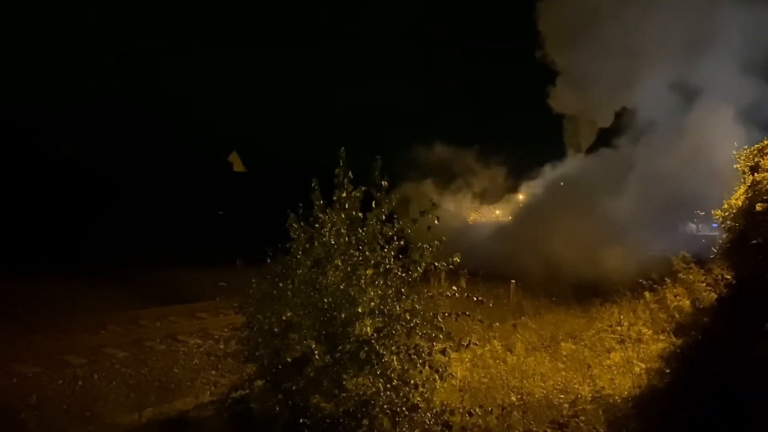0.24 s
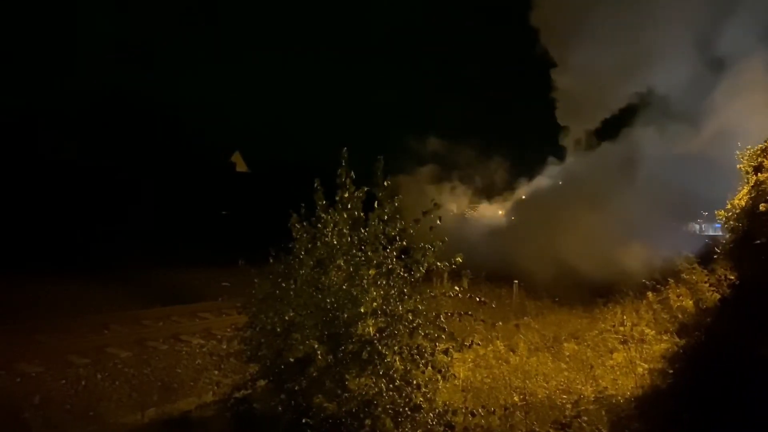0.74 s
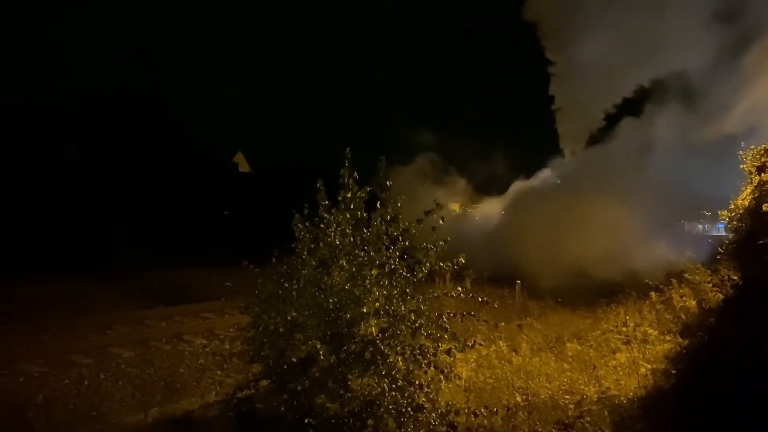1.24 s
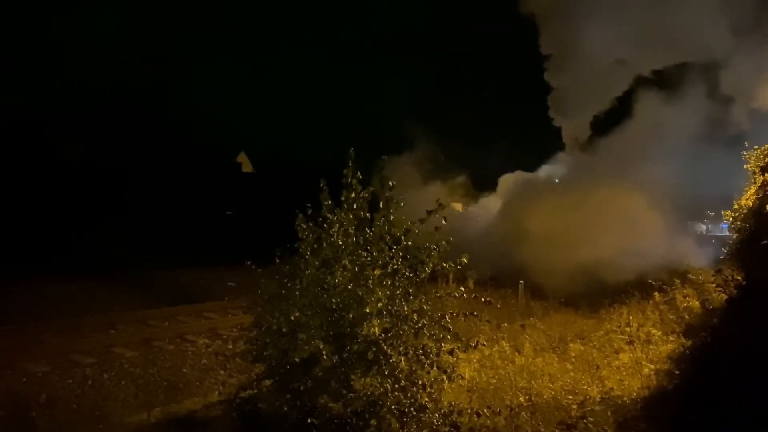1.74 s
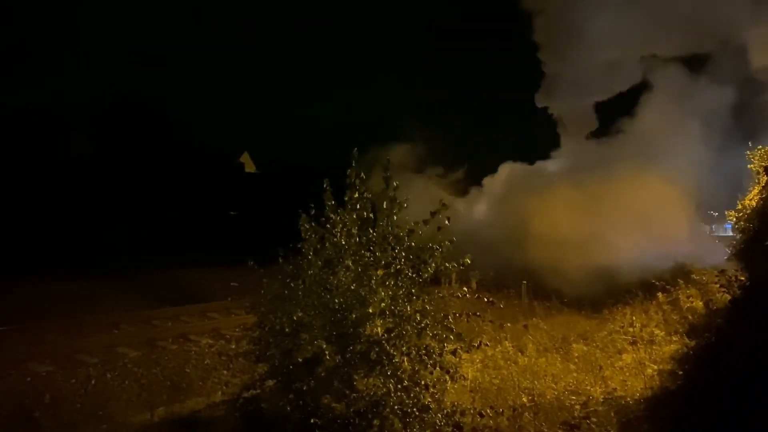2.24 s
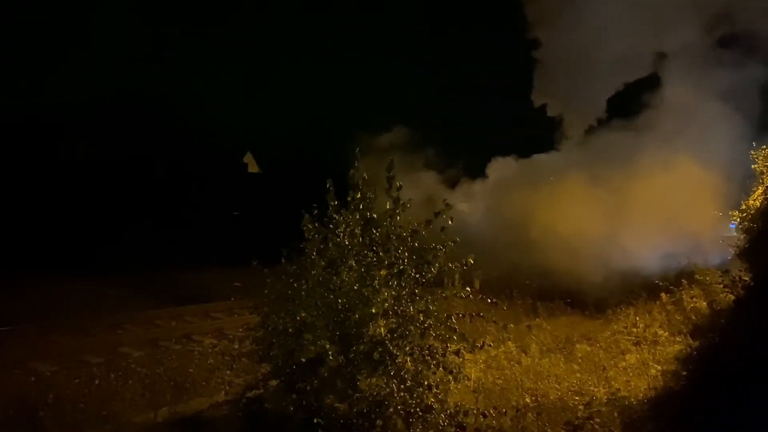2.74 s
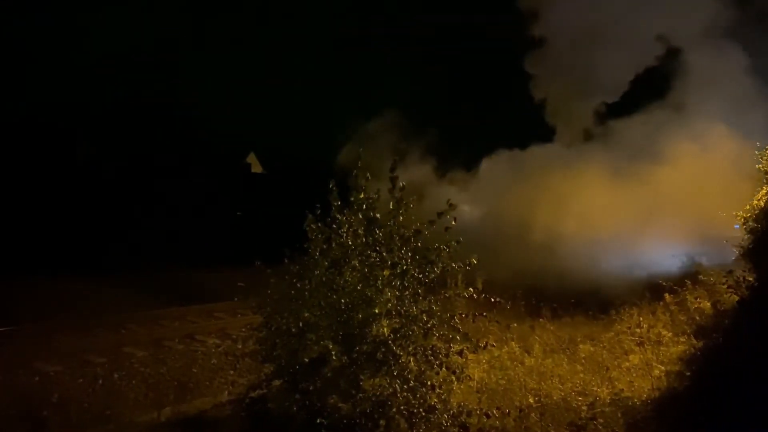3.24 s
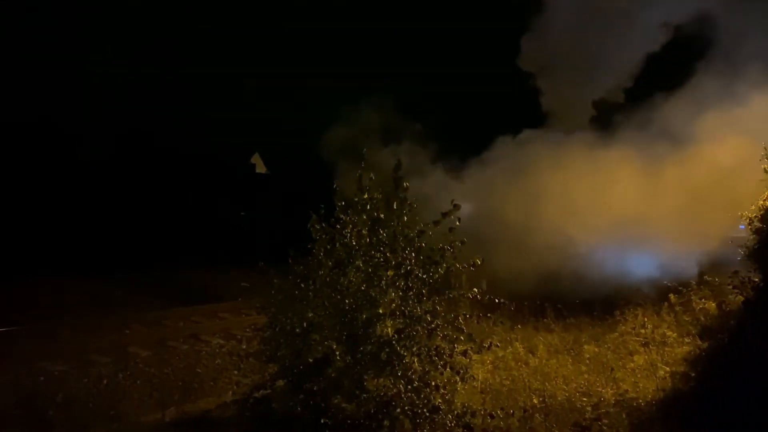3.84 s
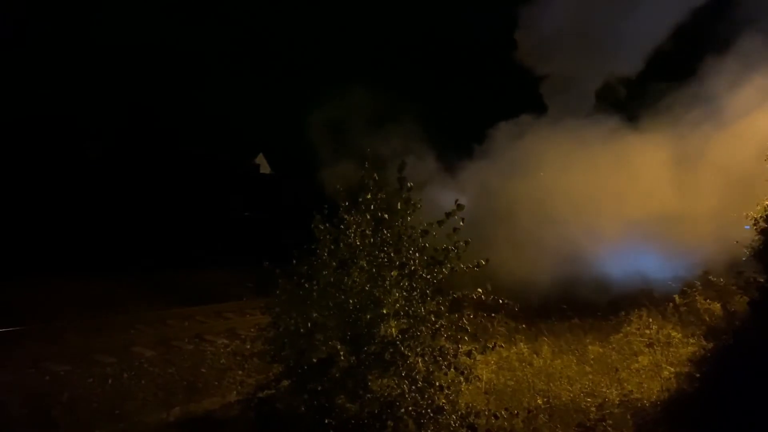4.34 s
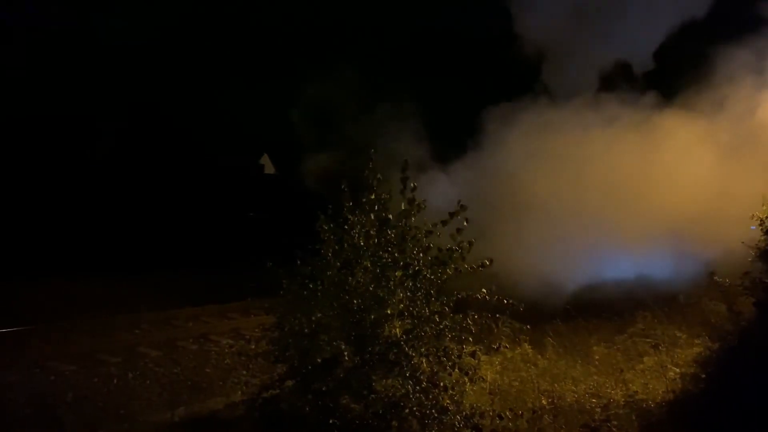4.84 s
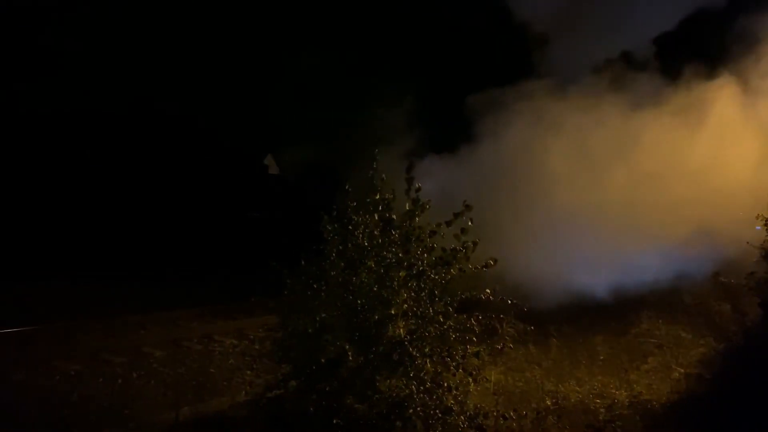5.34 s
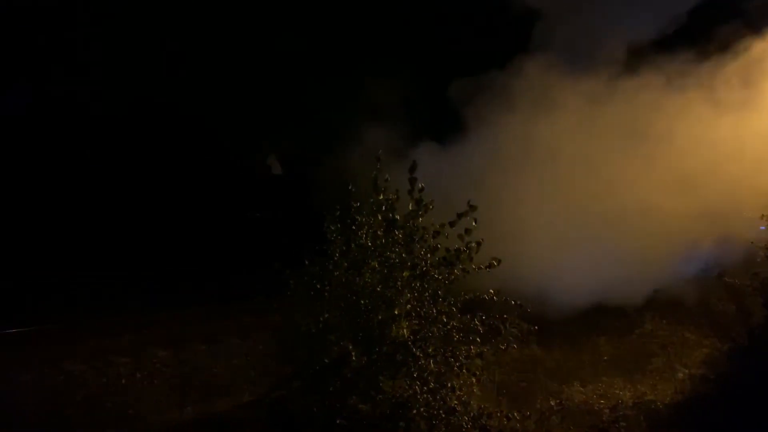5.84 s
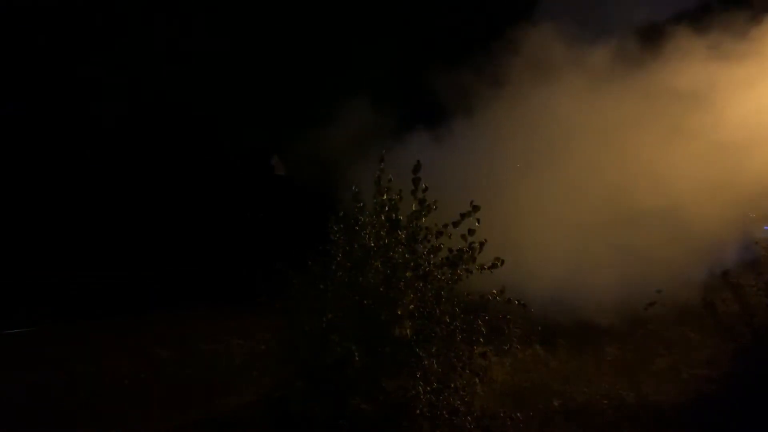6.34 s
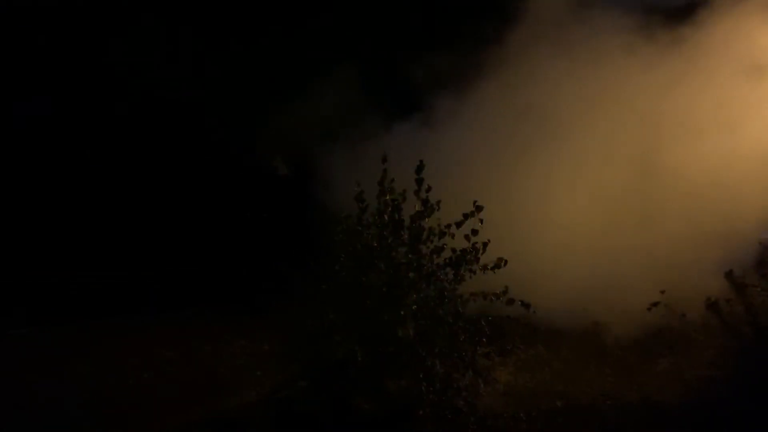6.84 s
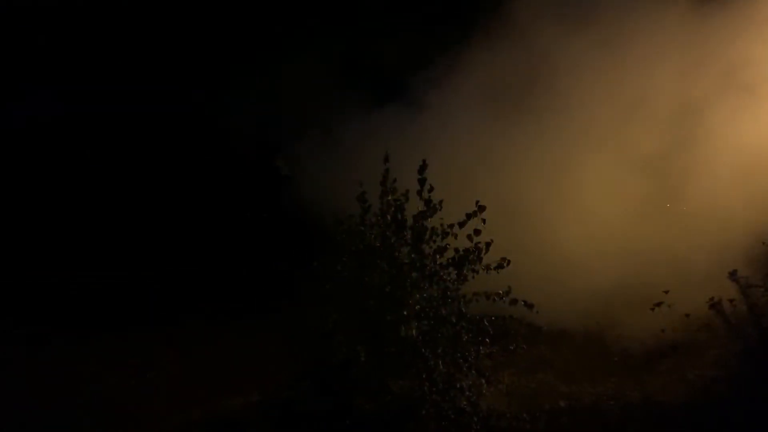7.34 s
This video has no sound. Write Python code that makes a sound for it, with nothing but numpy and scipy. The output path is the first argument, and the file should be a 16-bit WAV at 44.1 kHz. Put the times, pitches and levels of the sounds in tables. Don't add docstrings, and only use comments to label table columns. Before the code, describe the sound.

Powerful rushing steam jet hisses and surges for over six seconds, cuts suddenly, and rings away into faint far traffic and dull thuds.

```python
import sys
import numpy as np
from scipy import signal
from scipy.fft import rfft, irfft, next_fast_len
from scipy.io import wavfile
from scipy.ndimage import map_coordinates

SR = 44100
rng = np.random.default_rng(int(sys.argv[2]) if len(sys.argv) > 2 else 0)


def convert_level_to_amplitude(level_db):
    exponent = np.asarray(level_db, float) / 20
    return 10 ** exponent


def inscribe(sig):
    pcm = np.round(np.clip(np.atleast_2d(sig).T, -1, 1) * 32767)
    wavfile.write(sys.argv[1], SR, pcm.astype(np.int16))


N = 333836
SIZE = next_fast_len(N)
HZ = np.maximum(np.arange(SIZE // 2 + 1) * SR / SIZE, 1)
TIME = np.arange(N) / SR
LOWS = 1 / (1 + (HZ / 9000) ** 8)

# lag in ms, gain, centre in Hz, width in octaves.
RIGHT_NEAR = [(-.025, 1.25, 624, 1.05), (-.148, -.95, 4458, .25), (-.06, 2.29, 7935, .12),
              (-.25, -1.15, 11000, .3), (-.350, 1, 15300, .1)]
# time in seconds, level in dB, pitch in Hz, spread in seconds.
WHEEL_THUDS = [
    (6.585, -41, 100, .018),
    (6.77, -46, 105, .018),
    (7.112, -38, 95, .014),
    (7.5, -46, 160, .025),
]


def on_hz(table, hz, column=1):
    table = np.array(table)
    return np.interp(np.log(hz), np.log(table[:, 0]), table[:, column])


def noise(count):
    return rfft(rng.standard_normal((count, SIZE)))


def band_db(x, lo_hz, hi_hz):
    spectrum = rfft(x.mean(0), SIZE)[(HZ > lo_hz) & (HZ < hi_hz)]
    return 10 * np.log10(2 * np.sum(abs(spectrum) ** 2) / SIZE / N)


def shape(x, rule_db, size=256):
    overlap = size * 3 // 4
    hz, s, cells = signal.stft(x, SR, nperseg=size, noverlap=overlap)
    cells = cells * convert_level_to_amplitude(rule_db(s[None], np.maximum(hz, 20)[:, None]))
    return signal.istft(cells, SR, nperseg=size, noverlap=overlap)[1][..., :x.shape[-1]]


def patches(s, hz, rate, octaves):
    grid = rng.standard_normal((64, 512))
    places = np.broadcast_arrays(np.log2(hz / 20) / octaves, s * rate)
    return map_coordinates(grid, places, order=3, mode="wrap")


def bell(x, spread):
    return np.exp(-.5 * (x / spread) ** 2)


def paths(table):
    response = 0
    for lag_ms, gain, centre_hz, octaves in table:
        band = bell(np.log2(HZ / centre_hz), octaves)
        response = response + gain * band * np.exp(-2j * np.pi * HZ * lag_ms / 1000)
    return response


def night_air():
    # frequency in Hz, level in dB per Hz.
    air_colour = [(1500, -9.5), (2500, 1), (4000, -9.5), (6000, -6.5), (8000, -14), (11000, -17),
                  (15000, -20)]
    air_db, fade_from_s, fade_db_per_s = -77, 7.1, -3.
    rustle_start_s, rustle_stop_s, rustle_db = 7.07, 7.27, 5
    air, own = noise(count=2) * convert_level_to_amplitude(on_hz(air_colour, HZ))
    right = air * paths(RIGHT_NEAR) + .5 * own * LOWS
    hush = irfft(np.array([air, right]), SIZE)[:, :N]
    rustle = np.clip(np.minimum(TIME - rustle_start_s, rustle_stop_s - TIME) / .03, 0, 1)
    fade_db = fade_db_per_s * np.maximum(TIME - fade_from_s, 0)
    return hush * convert_level_to_amplitude(air_db - band_db(hush, 5000, 11000) + rustle_db * rustle + fade_db)


def road():
    # frequency in Hz, level in dB per Hz.
    road_colour = [(15, -46), (25, -30.5), (53, 2), (129, -4.5), (157, -6.5), (240, -12.5), (299, -11.5),
                   (342, -16), (436, -17.5), (533, -16), (695, -17), (991, -27), (1350, -24.5), (1510, -31),
                   (5000, -55), (6500, -89.5), (11000, -120)]
    # time in seconds, rumble level in dB.
    traffic = [
        (0.0, -55),
        (0.02, -56.5),
        (2.02, -52.5),
        (5.31, -48),
        (5.33, -46),
        (6.35, -49),
        (6.6, -45.5),
        (6.64, -48),
        (7.57, -49),
    ]
    rest_db = -52
    roar_db, roar_gain = -57.5, .8
    whine_db, whine_gain = -58.5, 0.5
    clatter_db, clatter_s, clatter_hz, clatter_octaves = 5., .045, 500, 1.1

    mid, side = noise(count=2) * convert_level_to_amplitude(on_hz(road_colour, HZ))
    side = side * np.clip(HZ / 1800, .05, 1)
    roar = irfft(np.array([mid + side, mid - side]), SIZE)[:, :N]
    low_db, high_db, top_db = band_db(roar, 40, 160), band_db(roar, 160, 420), band_db(roar, 600, 1500)

    def swell_db(s, hz):
        near = np.interp(s, *np.transpose(traffic)) - rest_db
        rumble = rest_db + near - 1.45 - low_db
        roar_share = np.clip(np.log2(hz / 120), 0, 1)
        whine_share = np.clip(np.log2(hz / 400), 0, 1)
        level = rumble + roar_share * (roar_db + roar_gain * near - high_db - rumble)
        level = level + whine_share * (whine_db + whine_gain * near - top_db - level)
        clatter = sum(bell(s - at, clatter_s) for at, *_ in WHEEL_THUDS)
        level = level + clatter_db * clatter * bell(np.log2(hz / clatter_hz), clatter_octaves)
        return level + 1.2 * patches(s, hz, 4.6, 0.817)
    return shape(roar, swell_db, size=2048)


def engines():
    # start in seconds, stop in seconds, first pitch in Hz, last pitch in Hz, top level in dB.
    notes_pulled = [(1.1, 2.75, 83, 103, -54), (2.95, 4.7, 120, 134, -54.5), (2.91, 4.9, 198, 202, -55.5),
                    (4.9, 5.8, 190, 170, -59.5), (5.0, 6.2, 84, 84, -49.5), (6.3, 7.2, 91, 96, -53),
                    (2.2, 5.3, 55, 55, -57), (6.2, 8.4, 50, 59, -56), (1.45, 2.2, 318, 316, -63),
                    (1.9, 3.5, 290, 358, -62), (3.2, 4.7, 348, 322, -62), (4.7, 5.8, 310, 335, -61),
                    (5.9, 6.9, 305, 340, -61)]
    swell_power, wander_share = .6, .012
    out, coarse = np.zeros(N), TIME[::256]
    for start, stop, from_hz, to_hz, db in notes_pulled:
        along = np.clip((TIME - start) / (stop - start), 0, 1)
        waver = np.interp(TIME, coarse, patches(coarse, 20, 8., 1))
        wander = np.interp(TIME, coarse, patches(coarse, 20, 3., 1))
        hz = (from_hz + (to_hz - from_hz) * along) * (1 + wander_share * wander)
        swell = abs(np.sin(np.pi * along)) ** swell_power
        level = np.sqrt(2) * swell * convert_level_to_amplitude(db - 1.2 + 2.5 * waver)
        out += level * np.sin(2 * np.pi * np.cumsum(hz) / SR)
    return out


def thuds():
    out = np.zeros(N)
    for at, db, hz, spread in WHEEL_THUDS:
        out += convert_level_to_amplitude(db) * bell(TIME - at, spread) * np.sin(2 * np.pi * hz * (TIME - at))
    return out


def yard(x):
    # level in dB, 60 dB decay time in seconds at 1 kHz, factor on that time per octave.
    tails = [
        (-25.5, 0.87, 0.82),
        (-24.5, 3.9, 0.68),
    ]
    # lag in seconds, level in dB, top frequency in Hz.
    slaps = [
        (0.049, -25.5, 9500),
        (0.111, -26, 9000),
        (.22, -38, 4000),
    ]
    length = 2 * SR
    response = np.zeros((2, length))

    def add(sound, db):
        response[:] += convert_level_to_amplitude(db) * sound / np.sqrt(np.sum(sound ** 2, axis=1, keepdims=True))

    for db, t60, shorten in tails:
        hiss = rng.standard_normal((2, length))
        add(shape(hiss, lambda s, hz: -60 * s / (t60 * shorten ** np.log2(hz / 1000))), db)
    for lag, db, top_hz in slaps:
        burst = rng.standard_normal((2, length)) * bell(TIME[:length] - lag, 0.0081)
        add(signal.sosfilt(signal.butter(1, top_hz, fs=SR, output="sos"), burst), db)
    left, right = rfft(response, SIZE)
    right = right * LOWS + left * (1 - LOWS)
    ring = irfft(np.array([left, right]), SIZE)[:, :length]
    return signal.fftconvolve(x, ring, axes=1)[:, :N]


def jet_hiss():
    # frequency in Hz, jet level in dB per Hz, scattered share left in dB, scattered share right in dB.
    jet_colour = [(430, -20, -20, -10), (650, -9.5, -14, -7.5), (874, -6.5, -20, -17),
                  (1300, -4.5, -5, -11.5), (1900, 0.0, -10, -11.5), (2800, -7.5, 2, 2.5),
                  (4000, -8, 5.5, 1.2), (5730, -7.5, 0.5, 4), (6970, -8, 2.5, 5), (7900, -9, 4.5, -22),
                  (9600, -6.5, -8.5, -8.5), (11930, -12.5, 4, -9), (14000, -20, -20, -15),
                  (15150, -18, -23.5, 7.5)]
    # lag in ms, gain, centre in Hz, width in octaves.
    left_paths = [
        (1.932, -.4, 1165, .7),
        (1.756, -.59, 3423, .31),
        (.5, -.23, 3579, 2.44),
    ]
    # lag in ms, gain, centre in Hz, width in octaves.
    right_echo = [
        (2.024, -1.38, 1782, .83),
        (1.816, .96, 4837, .39),
    ]
    # lag in ms, gain, centre in Hz, width in octaves.
    scatter_echo = [
        (2.01, -.42, 2300, .7),
        (1.74, -.45, 5250, .16),
    ]
    jet, left, right = noise(count=3)
    scatter = (1 + paths(scatter_echo)) * convert_level_to_amplitude(-2.5) * LOWS
    left = jet * (1 + paths(left_paths)) + left * scatter * convert_level_to_amplitude(on_hz(jet_colour, HZ, column=2))
    right = jet * paths(RIGHT_NEAR + right_echo) + right * scatter * convert_level_to_amplitude(on_hz(jet_colour, HZ, column=3))
    low_cut = 1 / (1 + (400 / HZ) ** 6)
    return irfft(np.array([left, right]) * convert_level_to_amplitude(on_hz(jet_colour, HZ)) * low_cut, SIZE)[:, :N]


def flow_db(s, hz, hiss):
    edges = np.array([600, 1500, 2800, 6500, 11500])
    # level in dB at rest flow, dB gained per dB of flow.
    jet_parts = [
        (-38, .5),
        (-36, 0.86),
        (-34.5, 1.105),
        (-36, 1.09),
    ]
    # time in seconds, level in dB, brightness in dB per octave.
    steam_flow = [(0.0, -28, 1.4), (0.23, -29, 1.2), (0.48, -31, 0.4), (0.94, -33, -0.3),
                  (1.43, -30.5, -0.3), (1.81, -30.5, -0.5), (2.37, -27, 0.4), (2.73, -29, 0.54),
                  (3.03, -30.5, 0.3), (3.31, -29, 0.4), (3.43, -31, -0.5), (3.61, -29, -0.3),
                  (4.23, -32, 0.2), (5.1, -23.5, -0.54), (5.44, -23.5, -0.14), (5.93, -26, 0.1),
                  (6.22, -20, -0.2), (6.36, -22.5, -0.4)]
    # time in seconds, spread in seconds, level in dB.
    spurts = [
        (1.1, 0.066, 4.5),
        (2.4, .06, 5),
        (2.75, 0.15, 5),
        (3.27, 0.048, 4.5),
        (3.68, 0.057, 4.5),
        (4.41, .035, 8),
        (4.75, 0.044, 4),
        (5.07, 0.046, 5.5),
        (5.38, 0.064, 4.5),
        (6.25, .07, 2.5),
    ]
    rest_flow_db, spurt_hz, spurt_octaves = -29, 9900, .25
    rest_db = [band_db(hiss, *pair) for pair in zip(edges, edges[1:])]
    centres = np.log(edges[1:] * edges[:-1]) / 2
    shares = [np.interp(np.log(hz), centres, row) for row in np.eye(len(centres))]
    times, flow, bright = np.transpose(steam_flow)
    flow = np.interp(s, times, flow) - rest_flow_db
    level = np.interp(s, times, bright) * np.log2(hz / 2800)
    for share, (db, gain), rest in zip(shares, jet_parts, rest_db):
        level = level + share * (db + gain * flow - rest)
    spurt = sum(db * bell(s - at, spread) for at, spread, db in spurts)
    return level + spurt * bell(np.log2(hz / spurt_hz), spurt_octaves)


def vapour_db(s, hz):
    # time in seconds, spread in seconds, centre in Hz, level in dB.
    eddies = [(0.28, 0.37, 4400, 6), (1.0, 0.25, 3050, -4.5), (1.4, 0.21, 1460, 6.5),
              (1.53, 0.6, 6400, 1.5), (3.62, 0.37, 2800, 5.5), (3.85, .2, 4140, 2.5), (4.32, 0.74, 650, 3),
              (4.97, 0.17, 3200, 4.5), (5.5, .2, 1800, 3), (5.62, 0.17, 3400, -4), (5.7, 0.085, 5230, 2.5),
              (5.62, 0.31, 1042, 3), (6.3, 0.2, 3100, 4), (6.3, 0.17, 1700, 1.2), (6.15, .15, 8500, 2),
              (.55, .15, 6000, -3), (5.05, .2, 4300, -2), (1.1, .2, 1100, -2.5), (6.37, .06, 1050, -7),
              (6.39, .05, 650, -6), (3.05, .12, 2200, -4), (4.6, .2, 7500, 3), (.8, .3, 7500, 3),
              (5.65, .1, 8500, 3), (5.4, .15, 780, -3)]
    # time in seconds, spread in seconds, centre in Hz, level in dB.
    teeth = [(.4, 0.37, 1810, 2.5), (1.81, 0.65, 4530, -5), (1.86, 0.26, 1900, -8), (2.55, 0.91, 2240, 6.5),
             (2.6, 0.42, 1750, -5), (3.3, 0.48, 2990, -11), (3.76, 0.35, 1610, -2.5),
             (4.64, 0.21, 2210, -5), (5.39, 0.28, 1300, -7), (5.57, 0.23, 2160, -13),
             (6.22, 0.21, 1200, -13.5), (.1, .15, 1330, -6), (1.9, .4, 1300, 3), (.6, .35, 3600, 4),
             (3.9, .25, 4800, -4)]
    top_flutter_db, top_flutter_hz = 1.2, 14800
    level = 0
    for table, octaves in ((eddies, 0.25), (teeth, 0.058)):
        for at, spread, centre_hz, db in table:
            level = level + db * bell(s - at, spread) * bell(np.log2(hz / centre_hz), octaves)
    level = level + 1.63 * patches(s, hz, 3.248, .12)
    level = level + 0.36 * patches(s, hz, 9., 0.891)
    level = level + 0.87 * patches(s, hz, 35., 0.612)
    top_share = np.clip((hz - top_flutter_hz) / 500 + 1, 0, 1)
    return level + top_flutter_db * patches(s, 20, 14., 1) * top_share


def valve_db(s, hz):
    valve_s, shut_s, treble_lead_s, drop_db = 6.372, .06, .006, -42.5
    shut = np.clip((s - valve_s + treble_lead_s * np.log2(hz / 1500)) / shut_s, 0, 2)
    return drop_db * shut ** 2


def steam():
    hiss = jet_hiss()

    def swell_db(s, hz):
        return flow_db(s, hz, hiss) + vapour_db(s, hz) + valve_db(s, hz)
    return shape(hiss, swell_db, size=512)


def scene():
    jet = steam()
    lean = convert_level_to_amplitude(np.array([[-.4], [.4]]))
    return night_air() + (road() + engines() + thuds()) * lean + yard(jet) + jet


def roll_off(x):
    return signal.sosfilt(signal.butter(12, 15550, fs=SR, output="sos"), x)


def record(dry):
    return roll_off(dry)


dry = scene()
out = record(dry)
inscribe(out)
```